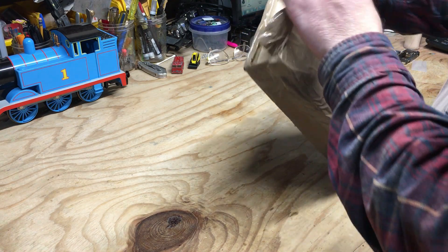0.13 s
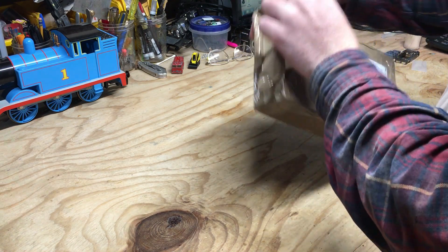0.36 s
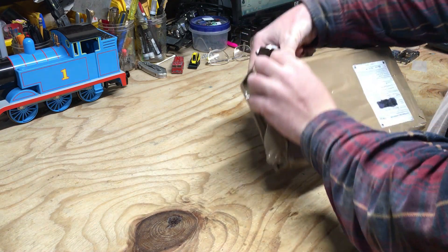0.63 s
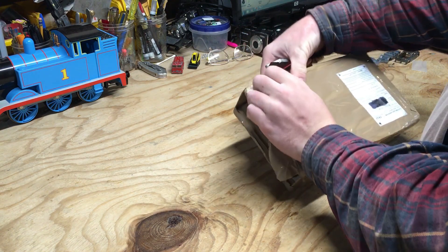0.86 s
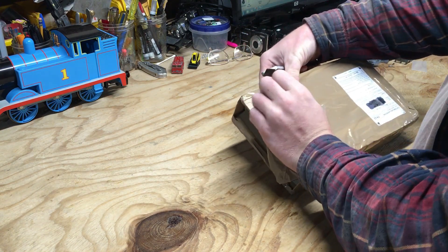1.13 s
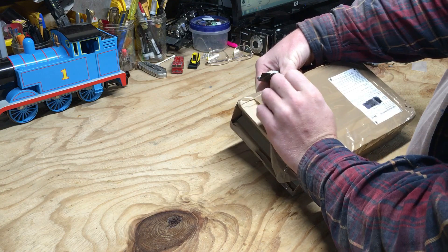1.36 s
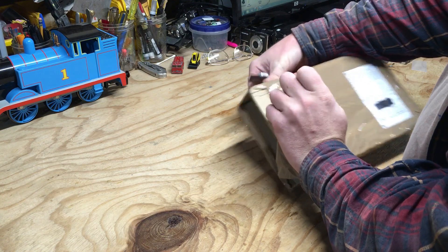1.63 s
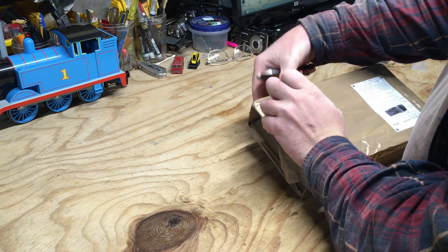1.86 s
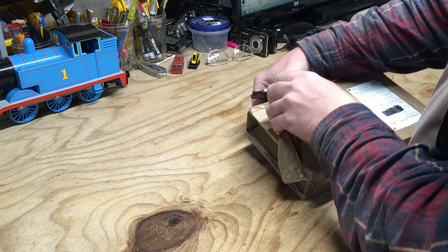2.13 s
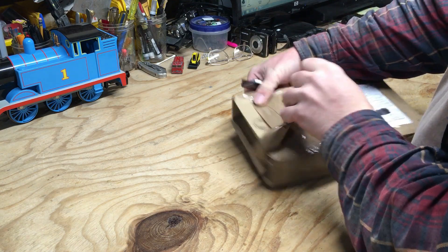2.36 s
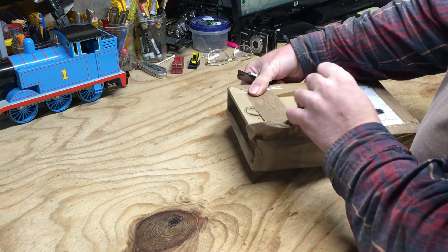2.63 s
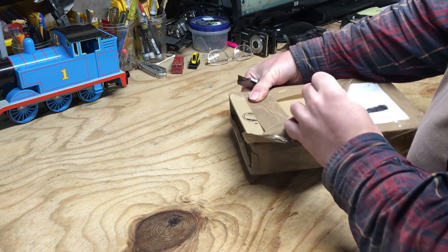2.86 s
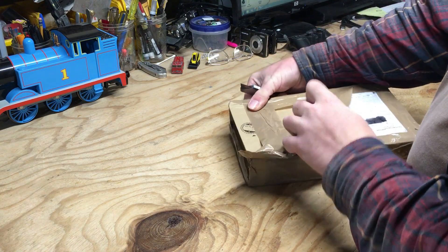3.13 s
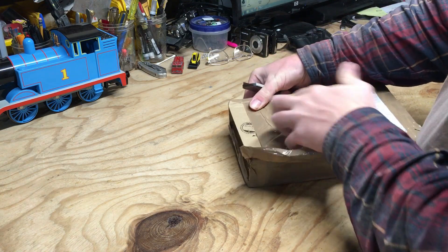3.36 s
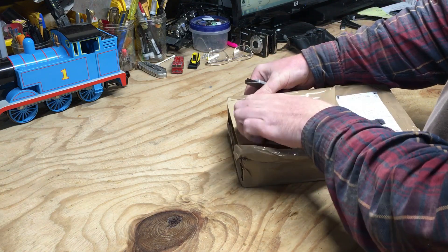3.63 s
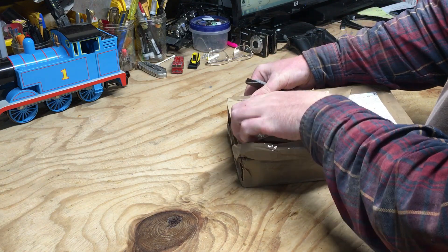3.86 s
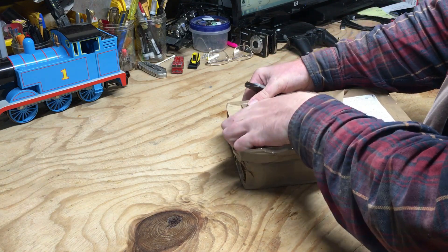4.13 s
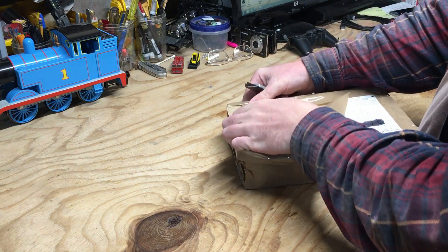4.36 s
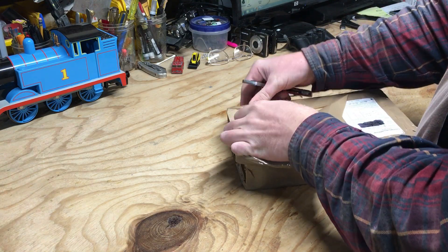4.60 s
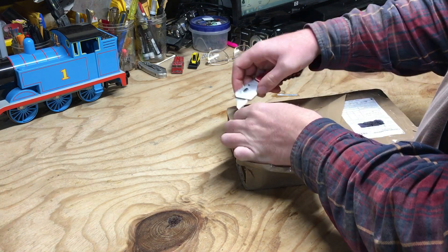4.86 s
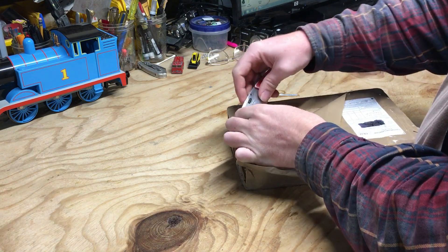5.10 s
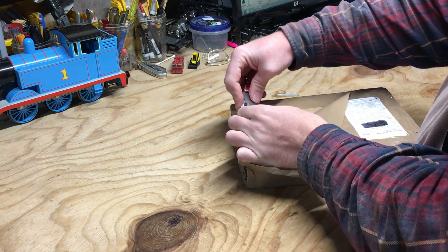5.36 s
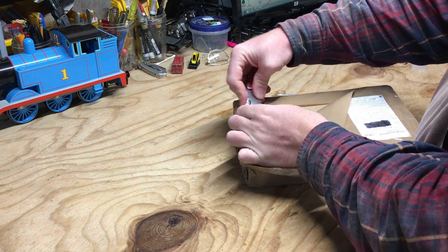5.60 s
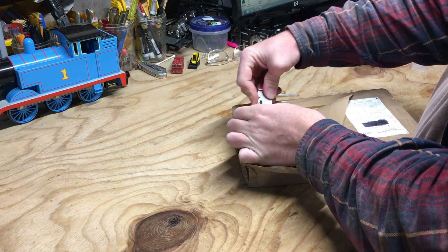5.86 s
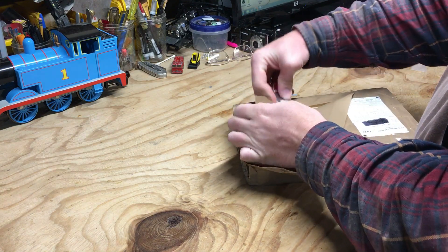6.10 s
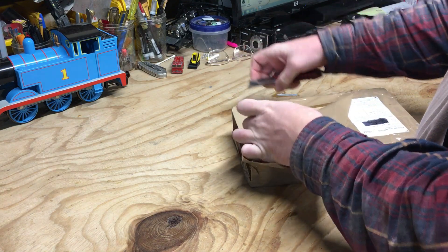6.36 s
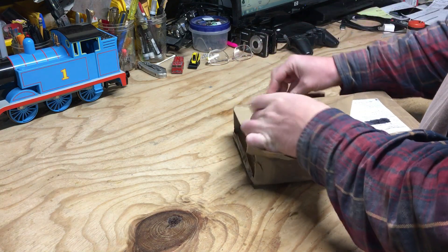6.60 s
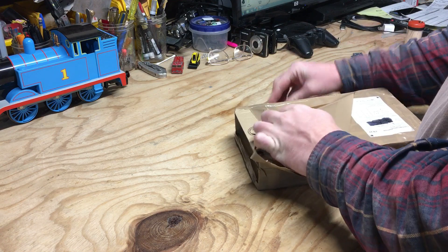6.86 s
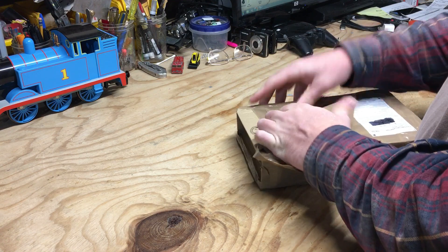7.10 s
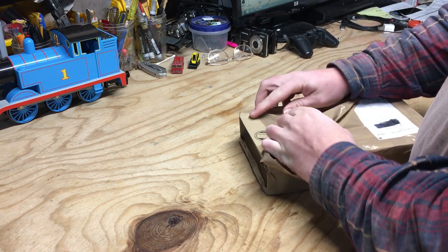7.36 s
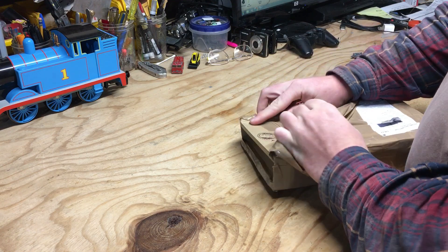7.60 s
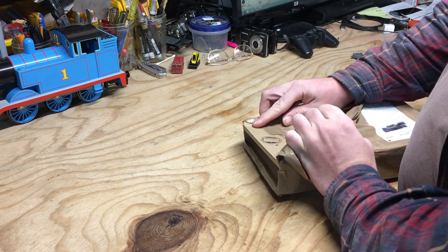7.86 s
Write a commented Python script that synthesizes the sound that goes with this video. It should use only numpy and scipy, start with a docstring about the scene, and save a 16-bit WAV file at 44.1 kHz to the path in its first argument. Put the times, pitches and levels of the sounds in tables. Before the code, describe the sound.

A parcel being opened by hand, heard close on a workbench with short room reflections. Irregular crisp paper crackle has a hollow box tone beneath it. An early cluster of hard snaps leads to a quick, loud tape rip, then a long gentler stretch of crinkles, tiny ticks and soft rubbing. Firm, dull bumps come late, then a last pair of bright snaps, over very low hum and hiss.

```python
"""From the start a motor hums over quiet hiss while hands rustle brown paper: clumped creases over a soft rub.
Faint snaps of glue and creases on a cardboard parcel swell into loud ones near 1 s, with the hollow box speaking.
Finger slides (band noise) and single crease ticks join in; then low thuds, damped swings, of parcel and handling.
Near 2.4 s a taut strip of tape rips loudly; quieter snaps and ticks follow, then the firmest thuds from 6.3 s,
with scuffs of the box. Two loud snaps come near the end; a small room answers throughout, heard close by."""
import sys
import numpy as np
from scipy import signal
from scipy.io import wavfile
from scipy.ndimage import uniform_filter1d

SR = 44100
rng = np.random.default_rng(int(sys.argv[2]) if len(sys.argv) > 2 else 0)


def materialize(psi):
    """Save the field psi as 16-bit PCM at rate SR to the path in sys.argv[1].

    A 1-D psi becomes a single channel; in a 2-D psi each row is a channel.
    """
    bounded = np.clip(np.atleast_2d(psi).T, -1, 1)
    quanta = np.round(bounded * 32767).astype(np.int16)
    wavfile.write(sys.argv[1], SR, quanta)


def gain_from_db(level_db):
    """Convert decibel levels to linear amplitude factors (20 dB per decade)."""
    decades = np.asarray(level_db, float) / 20
    return 10 ** decades


N = 352006

HUM_HZ, HUM_DB = 56.6, -56  # motor: mean pitch [Hz], rms level [dB]
HISS_DB = -62  # rms level [dB]
# tone of the hiss: (frequency [Hz], relative density [dB])
HISS_TONE = [(70, 0), (150, -0.5), (400, -10), (1000, -18.5), (3000, -24.5), (5000, -32.5), (10000, -29),
             (16500, -26)]
# hand strokes over paper and tape: (full effort from [s], held [s], effort [dB], grip on the box [dB])
STROKES = [(.0, 0.18, -55.5, -3.5), (.26, 0.026, -59, 2), (.35, 0.039, -51.5, -10),
           (0.441, 0.18, -53.5, -7.5), (.68, 0.07, -46.5, -5), (0.853, 0.0042, -35.5, -18),
           (.95, .3, -54.5, -11), (1.3, 0.054, -42, -3), (1.571, 0.22, -49.5, -6.5), (1.781, 0.12, -53, -5),
           (2.03, 0.27, -61.5, -4), (2.343, 0.022, -22, -16), (2.376, 0.026, -14, -22),
           (2.428, 0.0073, -37, -0.5), (2.601, 0.089, -48.5, 2), (2.78, 0.12, -56, -3),
           (3.111, 0.14, -48.5, -11), (3.299, 0.1, -46.5, -5.5), (3.451, 0.13, -52, -3),
           (3.599, 0.048, -41, -6.5), (3.85, 0.032, -53, 4), (3.931, .28, -52, -7), (4.569, 0.2, -55.5, -7),
           (4.74, 0.14, -53.5, -15), (4.94, 0.12, -61, -15), (5.4, 0.071, -58, -7), (5.56, 0.051, -63, -5),
           (5.69, 0.037, -46, 0.5), (5.862, 0.014, -43, -11.5), (5.979, 0.021, -41.5, 1),
           (6.069, .3, -55, -2), (6.4, .25, -55.5, -5), (6.746, 0.032, -54, 12), (6.9, 0.11, -49, 0),
           (7.04, 0.054, -61.5, 5), (7.237, .25, -50, -2.5), (7.52, 0.31, -44, -7),
           (7.952, 0.054, -63, -19)]
# every stroke swells from rest, holds and fades; hands never rest fully
RISE_S, FALL_DB_PER_S, RESTING_DB, RESTING_GRIP_DB = 0.052, 270, -64.5, -6.5
# level of the sheet layer over time: (time [s], level [dB])
SHEET_LEVEL = [(.5, -0.5), (.93, -6.5), (1.04, 3), (1.5, -2), (1.65, 10), (2.2, -1), (2.9, 0), (4.0, 2),
               (4.6, 2), (5.2, -3), (5.64, 9.5), (5.7, -1), (5.97, 2), (6.9, 1.5), (7.75, -4)]
# short snaps, glue or crease letting go, or the box scuffing:
# (time [s], crack level [dB], thinness as extra air [dB], grip on the box [dB])
SNAPS = [(0.14, -54, 9, -18), (0.2656, -47.5, 5.5, 4), (0.353, -46, -3, -18), (.4549, -52, 11, -12),
         (0.5429, -31.5, 1, -15), (.647, -46.5, -12, 9.5), (.6819, -47, -5, -21), (0.9135, -21, -1.5, -9),
         (0.963, -39.5, 0, -19), (1.044, -42, 6, -20), (1.05, -26, 5, -13), (1.137, -22, -1, -11),
         (1.1717, -21.5, 7, -0.5), (1.2752, -17.5, -11, -3), (1.2773, -17, -6, -7), (1.2827, -21, 5, 0.5),
         (1.3357, -17.5, 2, -3.5), (1.4515, -19, 2, 0), (1.4835, -13.5, -3, -1.5),
         (1.5217, -15.5, -2, -4.5), (1.663, -41, 2, -8.5), (1.727, -44.5, 1, -13), (2.2225, -43, 7.5, -12),
         (2.319, -15.5, 1, -12), (2.3305, -19, -6, -9.5), (2.346, -19.5, -2, -10), (2.3566, -12, -3, -11),
         (2.37, -19.5, -9, -10), (2.378, -22.5, 4, -13), (2.382, -17.5, -11, -16), (2.395, -16.5, -1, -9),
         (2.4086, -17, -9, -13), (2.4185, -19, -5, -1), (2.435, -20.5, -7.5, -2), (2.4489, -22, -1, -4.5),
         (2.4653, -29.5, -6, 5), (2.583, -24, 10.5, -4), (2.5881, -22.5, -5, -3), (2.5969, -24, 3.5, -4),
         (2.6129, -20.5, 4, -7), (2.626, -19.5, 4, -5.5), (2.636, -19.5, 3, -5.5), (2.7647, -19, 2, -3),
         (2.806, -31.5, 2, -18), (2.9237, -17.5, 6.5, -3), (3.097, -46, -3, 15), (3.1458, -37.5, -3, -12),
         (3.1496, -42.5, -7, -24), (3.1582, -38, -3, -16), (3.1801, -41, -5, 6), (3.187, -36.5, -3, -5),
         (3.258, -43, -2.5, -9), (3.28, -44.5, 2, -4), (3.341, -37.5, 5, -3), (3.372, -44, 9, -3),
         (3.504, -50, 7, 4.5), (3.571, -28.5, 2, -40), (3.606, -42, 5, -12), (3.8229, -41.5, -5, -24),
         (3.8722, -52, 9, 1), (3.953, -52.5, 10, -3), (3.971, -45, 6, -5), (4.025, -40, 4, -14),
         (4.084, -46, 10.5, -1), (4.176, -50.5, 11, -8), (4.1951, -43.5, 9, -14.5), (4.403, -47, 3, -6),
         (4.565, -44.5, 8, -2), (4.568, -40.5, 8, -42), (4.671, -52, 9, -1), (4.712, -44.5, -5, -2),
         (5.056, -51.5, 3, -20), (5.203, -53, 1.5, -10), (5.317, -53, 3, -14), (5.394, -49.5, 3, -10),
         (5.641, -43.5, 0, -17), (5.6655, -48, -3, -3), (5.691, -36.5, -7, -12), (5.7077, -26, -4.5, -11.5),
         (5.853, -54, 1, 15), (5.9327, -40, -6, -42), (5.9564, -40.5, 6, -9), (5.9806, -43, 4, -5),
         (6.1055, -38, 8, 2), (6.2182, -39, -5, -8), (6.2217, -36.5, -6, -6), (6.2736, -39.5, -7, 6.5),
         (6.2814, -37.5, 2, -9), (6.472, -48.5, 10, -8), (6.5522, -44, -1, -20), (6.5685, -47, -5, -3),
         (6.7075, -40.5, 2.5, 22), (6.716, -40.5, 7, 12.5), (6.725, -51, 3, 20), (6.734, -53, 0, 24),
         (6.744, -52.5, -4, 20), (6.838, -43, 4, -4.5), (6.9084, -34, 8, -4.5), (6.898, -50, 3, 10),
         (6.926, -53, 5, 10), (6.966, -46, -4, 9), (6.9537, -36, 5.5, -28), (7.0172, -44.5, -4, 11.5),
         (7.19, -55, -3, 9.5), (7.2344, -44, 1.5, -4), (7.3792, -39, 3, -20), (7.404, -35, -8, -18),
         (7.448, -53, 12, -16), (7.4775, -40, 2, 0), (7.4979, -38, -4, -3.5), (7.589, -42, 4, -7),
         (7.65, -24, 5, -7), (7.7508, -17.5, 3, -4.5), (7.817, -52.5, 7, -16), (7.8402, -44, 10, -8)]
# the sheet's level rises with grip and with thinness [dB per dB]
SHEET_PER_GRIP, SHEET_PER_THIN = 0.21, 0.063
# treble of air and crack: (frequency [Hz], relative density [dB])
TREBLE = [(3300, -16), (4000, 4.5), (4930, -4.5), (5500, 4), (8200, 1.5), (9300, 7.5), (10500, 2.5),
          (15900, 6), (16900, -11)]
# resonances of the slack paper: (frequency [Hz], width [Hz], relative level [dB])
SHEET_MODES = [(1376, 420, 6), (2170, 3040, 4), (3310, 2710, 6)]
# resonances of the hollow box: (frequency [Hz], width [Hz], relative level [dB])
BOX_MODES = [(285, 197, 0.5), (505, 143, 1.5), (659, 103, 0.5), (830, 810, -2.5)]
# a long strip of tape is peeled under tension: (from [s], to [s])
TAUT_SPAN = 2.31, 2.49
# resonances of the stretched strip: (frequency [Hz], width [Hz], relative level [dB])
TAPE_MODES = [(1612, 600, -19), (3270, 2470, -6)]
TAPE_DB = 4  # the taut strip rings louder than slack paper
# skin or nail sliding smoothly over card: (start [s], length [s], level [dB], middle pitch [Hz])
BRUSHES = [(0.433, 0.097, -56.5, 1297), (2.231, 0.1, -57.5, 2670), (3.755, 0.038, -57.5, 2230),
           (3.828, 0.085, -49.5, 1094), (4.589, 0.052, -56, 1093), (4.6, .065, -59, 2000),
           (4.722, 0.21, -61.5, 3490), (4.74, .19, -62, 1446)]
# a single small crease flipping, without the box: (time [s], level [dB], extra air [dB])
TICKS = [(1.0194, -38, 11), (1.2231, -28, -7), (2.0103, -41, 1), (2.2104, -37, 4), (3.232, -34, -6),
         (3.325, -26.5, -8), (3.4184, -49, 3), (3.4291, -40, 1), (3.457, -44, 7), (3.4724, -46, 11),
         (3.5904, -27.5, -8), (3.929, -44.5, 5), (3.9943, -43, 9), (4.0384, -35, 6), (4.0564, -41, 8),
         (5.1283, -36, -8), (5.3738, -44.5, 2), (5.4417, -42, -4), (5.457, -37, -8), (5.4946, -37.5, -6),
         (5.5307, -47, 7), (5.5836, -41, -10), (5.675, -30, -4), (5.889, -35, -4), (6.0786, -47, 5),
         (6.1105, -26, -1), (6.1306, -34, -7), (6.1462, -34.5, -12), (6.1918, -35.5, -8), (6.3265, -38, -9),
         (6.4572, -36.5, -5), (6.8458, -32.5, -6), (7.002, -32, -9), (7.0457, -42, -3), (7.0647, -36, -4),
         (7.098, -34, -5), (7.136, -41, -13), (7.2444, -37, -10), (7.313, -36, 0), (7.3567, -31, -7)]
# low damped thuds, parcel on the bench, and faint low parts of handling:
# (time [s], deep swing level [dB], upper swings level [dB], t60 [s])
THUDS = [(1.67, -49, -46, 0.092), (1.75, -52, -42, 0.14), (3.6, -56, -46, 0.11), (5.701, -48, -40, 0.11),
         (7.65, -55, -46, 0.058), (7.751, -45, -34.5, 0.096), (2.34, -34, -32, .3),
         (2.402, -30.5, -35.5, 0.29), (2.601, -33, -32, 0.21), (3.098, -36, -36, 0.18),
         (4.561, -42, -44.5, 0.21), (5.983, -44, -43, 0.21), (6.272, -31, -24, 0.023),
         (6.71, -28.5, -25, 0.16), (6.898, -24, -26, 0.15), (6.918, -25.5, -29, 0.15),
         (6.973, -23, -25.5, 0.11), (7.02, -45, -44, 0.96)]
# mean pitches of the thuds' swings: (deep [Hz], upper [Hz], second upper [Hz])
THUD_HZ = 78.8, 168.6, 200.6
# near echoes off bench, arms and shelf: (delay [s], level [dB])
ECHOES = [(.0026, -25.5), (.0051, -14), (.0083, -18)]
# decay of the room: (frequency [Hz], t60 [s])
ROOM_DECAY = [(200, 0.17), (700, 0.18), (2000, 0.18), (5000, 0.15), (14000, 0.097)]


def evened(x):
    """Scales each row to rms 1."""
    return x / np.sqrt(np.mean(x ** 2, -1, keepdims=True) + 1e-20)


def smoothed(x, size):
    """Averages twice over a window of size samples, for a slow drift."""
    return uniform_filter1d(uniform_filter1d(x, size), size)


def read(points, hz):
    """Reads a curve at hz, along a logarithmic frequency axis."""
    f, value = np.transpose(points)
    return np.interp(np.log(hz + 1), np.log(f + 1), value)


def colour(x, gain):
    """Causal (minimum-phase) filter of unit energy with the given gain curve over frequency."""
    hz = np.abs(np.fft.fftfreq(8192, 1 / SR))
    log_gain = np.log(np.maximum(gain(hz), 1e-4))
    spectrum = np.exp(np.conj(signal.hilbert(log_gain)))
    taps = np.fft.ifft(spectrum).real[:3000]
    return signal.oaconvolve(x, taps / np.linalg.norm(taps))[:len(x)]


def humps(modes, hz):
    """Gain of a few broad resonances, with steep skirts."""
    return np.sqrt(sum(gain_from_db(2 * db) / (1 + (2 * (hz - f) / w) ** 2) ** 2 for f, w, db in modes))


def background():
    """The slightly wavering hum of a motor somewhere in the room over steady hiss."""
    waver_hz = .5 * evened(smoothed(rng.standard_normal(N), 4000))
    phase = 2 * np.pi * np.cumsum(HUM_HZ + waver_hz) / SR
    hum = np.sqrt(2) * gain_from_db(HUM_DB) * np.sin(phase)
    hiss = colour(rng.standard_normal(N), lambda hz: gain_from_db(read(HISS_TONE, hz)))
    return hum + gain_from_db(HISS_DB) * hiss


def bodies(air, crack, sheet, box):
    """Air and crack share the treble; paper or taut tape rings and the box booms, each from its own drive."""
    def air_share(hz):
        return 1 / (1 + (9000 / (hz + 1)) ** 8)

    def air_gain(hz):
        return gain_from_db(read(TREBLE, hz)) * np.sqrt(air_share(hz))

    def crack_gain(hz):
        return gain_from_db(read(TREBLE, hz)) * np.sqrt(1 - air_share(hz))

    def box_gain(hz):  # a small box radiates no deep bass
        return humps(BOX_MODES, hz) * hz ** 4 / (hz ** 4 + 215.0 ** 4)

    sample = np.arange(N)
    taut = (sample > TAUT_SPAN[0] * SR) & (sample < TAUT_SPAN[1] * SR)
    paper = colour(air, air_gain) + colour(crack, crack_gain)
    paper += colour(sheet * ~taut, lambda hz: humps(SHEET_MODES, hz))
    paper += gain_from_db(TAPE_DB) * colour(sheet * taut, lambda hz: humps(TAPE_MODES, hz))
    low_cut = signal.butter(2, 300, "high", fs=SR, output="sos")
    return signal.sosfilt(low_cut, paper) + colour(box, box_gain)


def effort():
    """Gain of the strokes on air, crack, sheet and box: efforts add in power, grip weighs most on the box."""
    t = np.arange(0, N / SR + .01, .002)
    start, held, db, grip_db = np.transpose(STROKES)[:, :, None]
    swell_db = (db - RESTING_DB) / RISE_S * np.maximum(start - t, 0)
    fade_db = FALL_DB_PER_S * np.maximum(t - start - held, 0)
    db = db - swell_db - fade_db
    power = []
    # air, crack, sheet, box: (level [dB], share of the grip)
    for own_db, share in [(-0.5, 0.072), (-3.0, 0.16), (0.97, 0.41), (-2.5, 0.93)]:
        strokes = gain_from_db(2 * (db + share * grip_db)).sum(0)
        rest = gain_from_db(2 * (RESTING_DB + share * RESTING_GRIP_DB))
        power.append(gain_from_db(2 * own_db) * (strokes + rest))
    # the rustle follows the sheet layer's level only in part
    power[2] = power[2] * gain_from_db(0.48 * np.interp(t, *np.transpose(SHEET_LEVEL)))
    return np.array([np.interp(np.arange(N) / SR, t, np.sqrt(p)) for p in power])


def rustle():
    """Small creases pop in clumps, each a tick with a short frayed tail, over the rub of fingers on paper."""
    clumps = gain_from_db(4.5 * evened(smoothed(rng.standard_normal(N), 350)))
    sizes = gain_from_db(3.5 * np.minimum(rng.exponential(1, N), 2.8))
    pops = sizes * (rng.random(N) < clumps * 300 / SR)  # around 300 a second
    # each pop has its own balance of air, crack, sheet and box
    pops = np.c_[[1, .9, .7, .45]] * pops * gain_from_db(4 * rng.standard_normal((4, N)).clip(-3, 1.5))
    fall = np.exp(-1 / (.0008 * SR))
    tails = signal.lfilter([.16], [1, -fall], pops) * rng.standard_normal((4, N))
    creases = (pops + tails) / np.std(pops[0] + tails[0])
    drift = gain_from_db(2.5 * evened(smoothed(rng.standard_normal((4, N)), 900)))  # the rub's colour drifts
    rubs = gain_from_db(-7) * evened(drift * np.sqrt(clumps) * rng.standard_normal((4, N)))
    return bodies(*effort() * evened(creases + rubs))


def bursts(s, db, rise, t60, tick, whole=False):
    """At each time a tick and a ragged dying run of fibre clicks, or both as one whole click."""
    t = np.arange(2200) / SR
    size = (len(s), len(t))
    shape = (1 - np.exp(-t / rise)) * gain_from_db(-60 * t / t60)
    ragged = gain_from_db(4 * rng.exponential(1, size).clip(0, 3))
    burst = shape * rng.standard_normal(size) * ragged
    burst = evened(burst) / np.sqrt(len(t))  # unit energy
    burst[:, 0] += tick
    if whole:
        burst = (t == 0) * np.linalg.norm(burst, axis=1, keepdims=True)
    at = np.round(s * SR).astype(int)[:, None] + np.arange(len(t))
    burst = gain_from_db(db)[:, None] * burst
    out = np.bincount(at.ravel(), burst.ravel(), N + len(t))[:N]
    return np.sqrt(.003 * SR) * out  # a unit-energy burst at 0 dB has rms 1 if spread over 3 ms


def snaps(whole=False):
    """Short snaps: air and crack start at once, sheet and box swell more slowly, the sheet drive dies last."""
    s, crack_db, thin_db, grip_db = np.transpose(SNAPS)
    layer_db = np.interp(s, *np.transpose(SHEET_LEVEL))
    sheet_db = crack_db + layer_db + SHEET_PER_GRIP * grip_db + SHEET_PER_THIN * thin_db - 0.6
    air = bursts(s, crack_db + thin_db - 1.5, rise=.0001, t60=0.011, tick=0.9, whole=whole)
    crack = bursts(s, crack_db + 0.39, rise=0.00021, t60=0.019, tick=0.72, whole=whole)
    sheet = bursts(s, sheet_db, rise=0.00027, t60=0.036, tick=1.0, whole=whole)
    box = bursts(s, crack_db + grip_db + 0.36, rise=0.00084, t60=0.019, tick=0.39, whole=whole)
    return bodies(air, crack, sheet, box)


def brushes(width=0.4, climb=0.084, uneven_db=5.0):
    """Soft noise in one band (width and climb as shares of its pitch) that climbs as the finger slides."""
    out = np.zeros(N)
    for s, length, db, hz in BRUSHES:
        u = np.linspace(0, 1, round(length * SR))
        a, b, c = rng.standard_normal((3, SR // 2))[:, :len(u)]
        low_pass = signal.butter(2, width * hz / 2, fs=SR, output="sos")
        band = signal.sosfilt(low_pass, a + 1j * b)
        # shift the noise up to its gliding pitch
        turn = np.exp(2j * np.pi * np.cumsum(hz * (1 + climb * (u - .5))) / SR)
        uneven = uneven_db * evened(uniform_filter1d(c, 300))
        level = gain_from_db(db + uneven) * np.sqrt(np.sin(np.pi * u).clip(0))
        out[round(s * SR):][:len(u)] += level * evened((band * turn).real)
    return out


def ticks():
    """A crease flips: one sharp tick and hardly any tail; the sheet answers faintly."""
    s, db, air_db = np.transpose(TICKS)
    air = bursts(s, db + air_db - 9.5, rise=.0001, t60=.006, tick=1.5)
    crack = bursts(s, db - 11.0, rise=.0001, t60=0.0094, tick=0.91)
    sheet = bursts(s, db - 16.0, rise=.0002, t60=0.01, tick=0.64)
    return bodies(air, crack, sheet, np.zeros(N))


def thuds():
    """Low damped swings, each thud tuned a little differently."""
    out, t = np.zeros(N + SR), np.arange(SR // 2) / SR
    tunings = rng.uniform(.94, 1.06, (len(THUDS), 3))
    for (s, deep_db, upper_db, t60), tuning in zip(THUDS, tunings):
        # a wandering phase blurs the pitch
        rocking = np.c_[[.015, .04, .06]] * np.cumsum(rng.standard_normal((3, len(t))), 1)
        deep, *upper = np.sin(2 * np.pi * np.outer(tuning * THUD_HZ, t) + rocking)
        ring = gain_from_db(deep_db) * deep + gain_from_db(upper_db) * (upper[0] + .5 * upper[1])
        shape = gain_from_db(-60 * t / t60) * (1 - np.exp(-t / 0.0032))
        out[round(s * SR):][:len(t)] += shape * ring
    return out[:N]


def room(x, far, tail_db=-9):
    """A few near echoes, then, fed by far, sparse taps of random sign dying band by band; three tails take turns."""
    out = x + sum(gain_from_db(db) * np.pad(x, (round(s * SR), 0))[:N] for s, db in ECHOES)
    at = np.arange(200, SR // 2 - 20, 20)
    for k in range(3):
        taps = np.zeros(SR // 2)
        taps[at + rng.integers(0, 20, len(at))] = rng.choice([-1., 1.], len(at))
        hz, t, z = signal.stft(taps, SR, nperseg=256)
        decay = gain_from_db(-60 * t / read(ROOM_DECAY, hz)[:, None])
        tail = signal.istft(z * decay, SR, nperseg=256)[1]
        turn = np.sqrt(2 / 3) * np.sin(np.pi * (np.arange(N) * 23 / SR + k / 3))
        out += gain_from_db(tail_db) * signal.oaconvolve(far * turn, tail / np.linalg.norm(tail))[:N]
    return out


def scene():
    """Paper and tape in the room, its tail fed each snap as one even click; thuds and background stay dry."""
    small = ticks() + gain_from_db(-1.5) * rustle() + brushes()
    in_room = room(snaps() + small, snaps(whole=True) + small)
    return (in_room + thuds() + background())[None]


def roll_off(x):
    """The treble ends steeply here."""
    return signal.sosfilt(signal.butter(12, 17090, fs=SR, output="sos"), x)


def record(dry):
    """Deep bass is cut, the treble ends near 16 kHz and the loudest cracks overload softly."""
    low_cut = signal.butter(4, 45, "high", fs=SR, output="sos")
    heard = signal.sosfilt(low_cut, dry)
    high_cut = signal.firwin(801, 15900, window=("kaiser", 8), fs=SR)
    heard = signal.oaconvolve(heard, high_cut[None], "same")
    mix = 0.89 * np.tanh(heard / 0.86)
    return roll_off(mix)


dry = scene()
out = record(dry)
materialize(out)
```